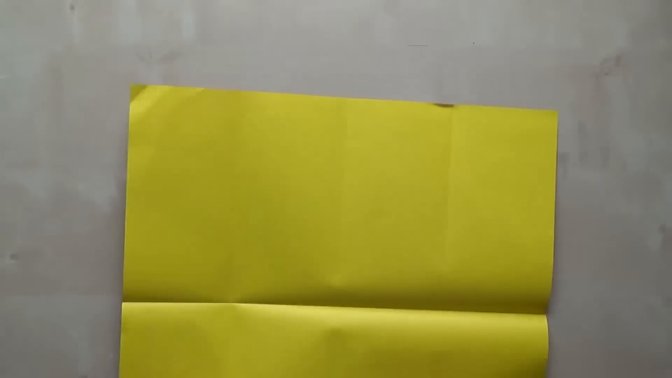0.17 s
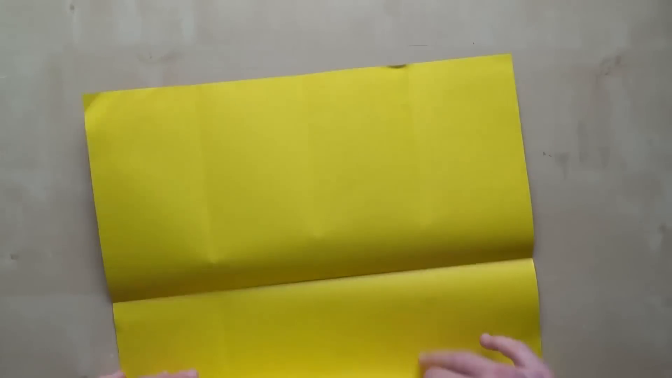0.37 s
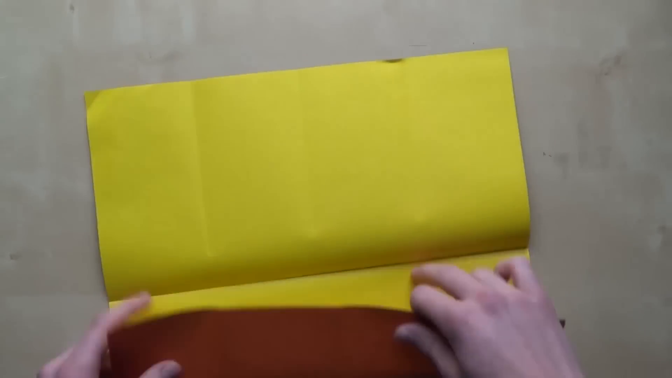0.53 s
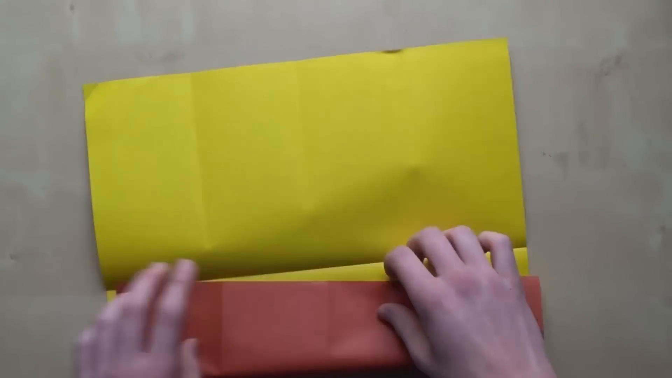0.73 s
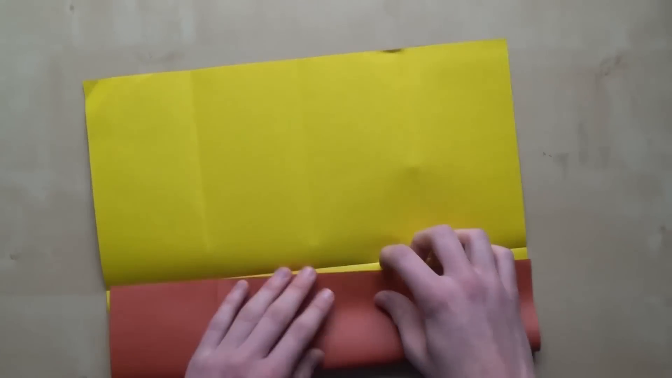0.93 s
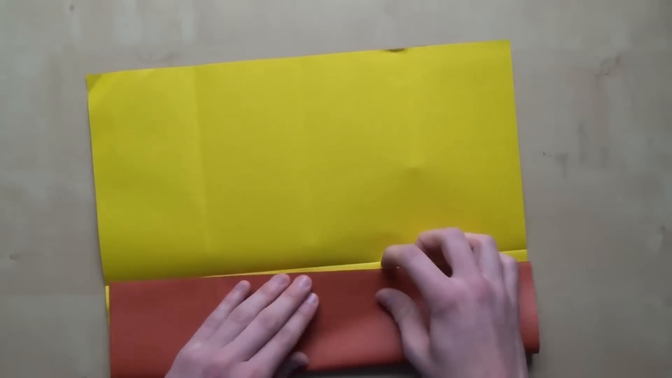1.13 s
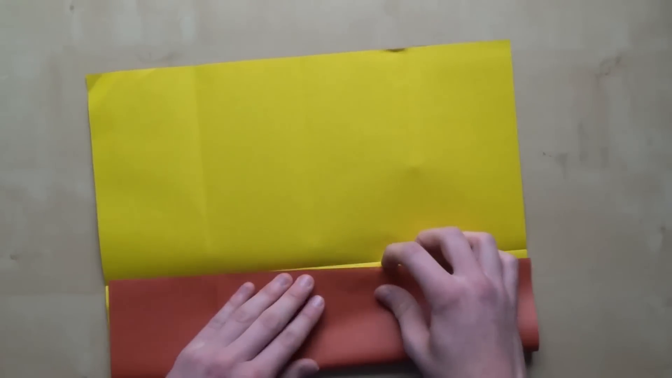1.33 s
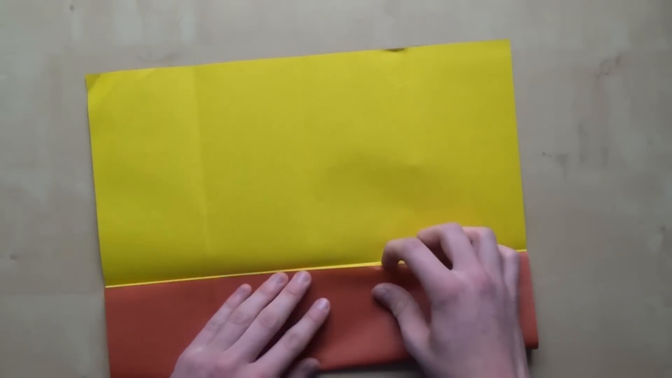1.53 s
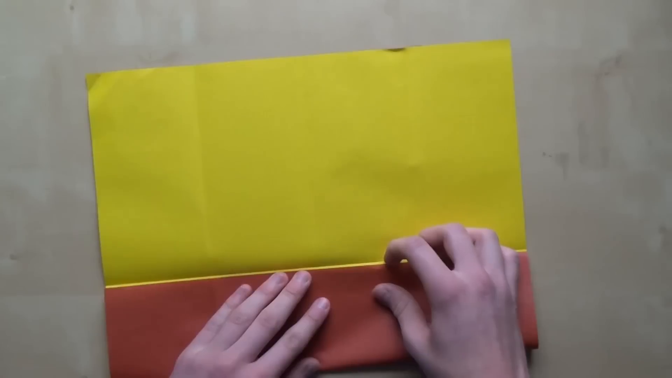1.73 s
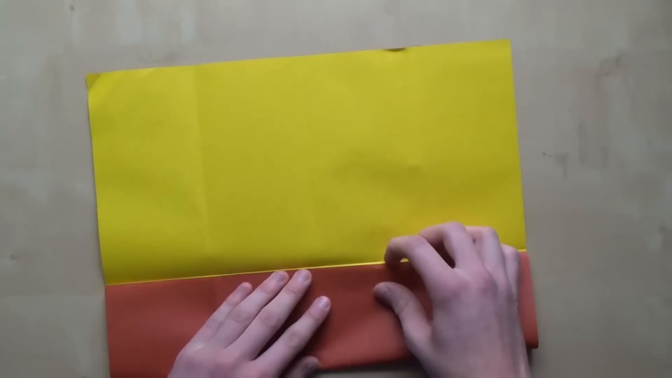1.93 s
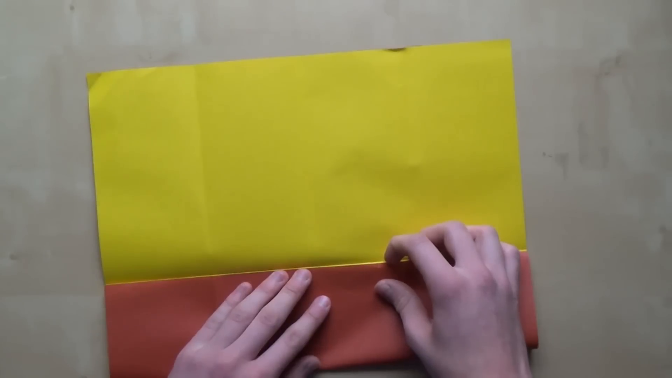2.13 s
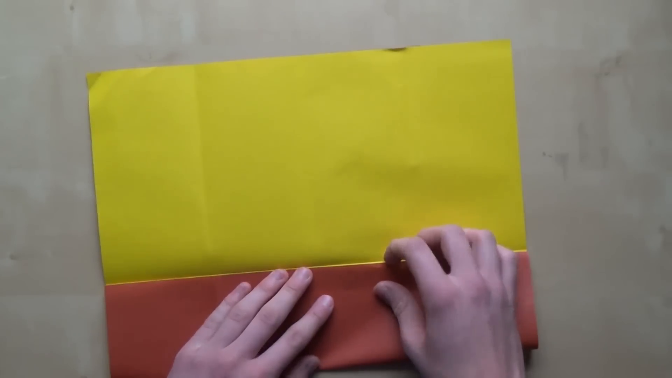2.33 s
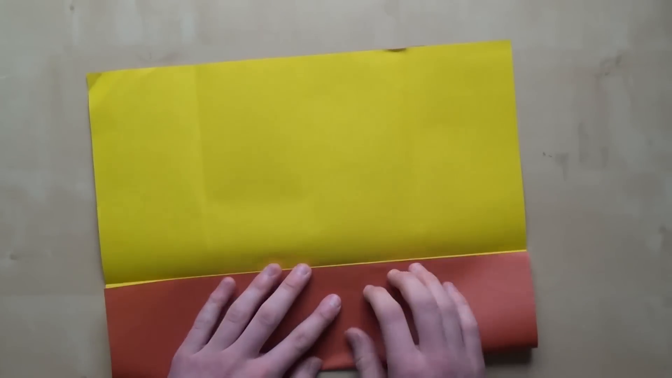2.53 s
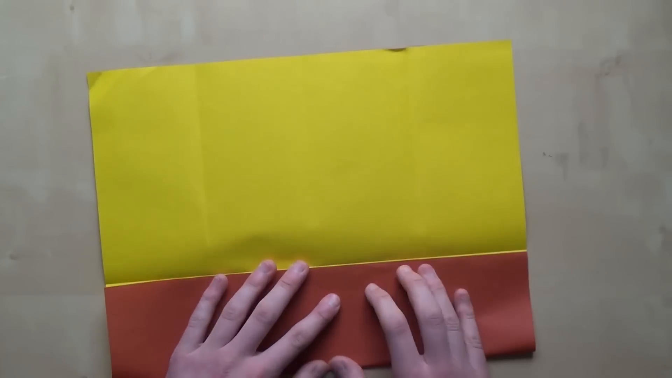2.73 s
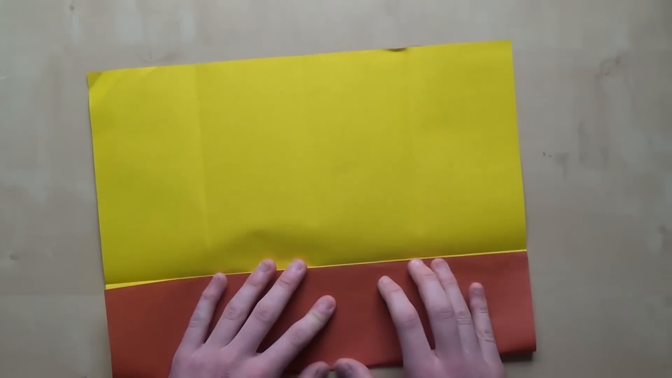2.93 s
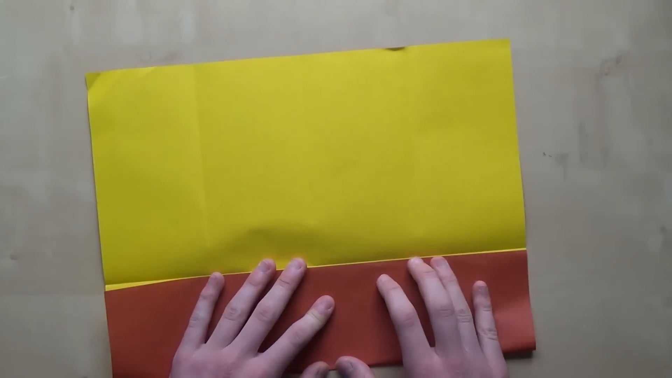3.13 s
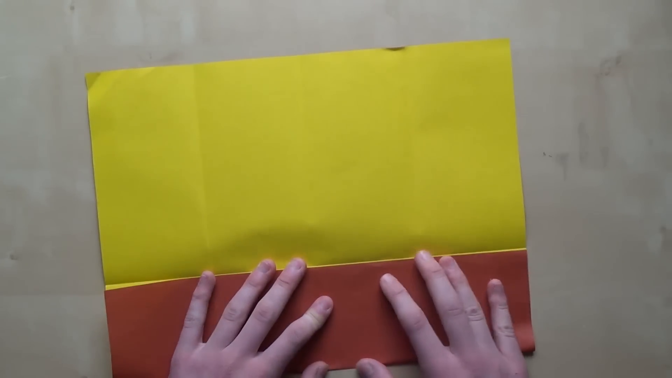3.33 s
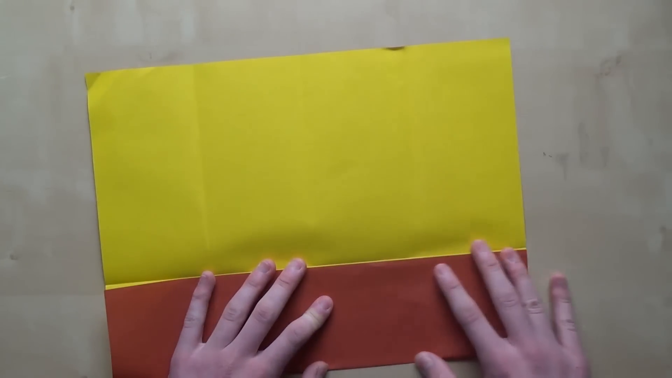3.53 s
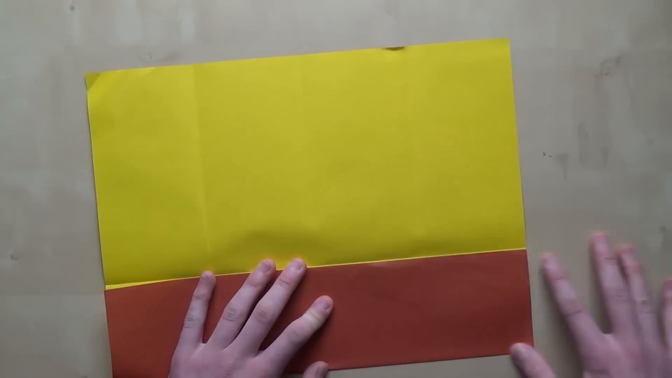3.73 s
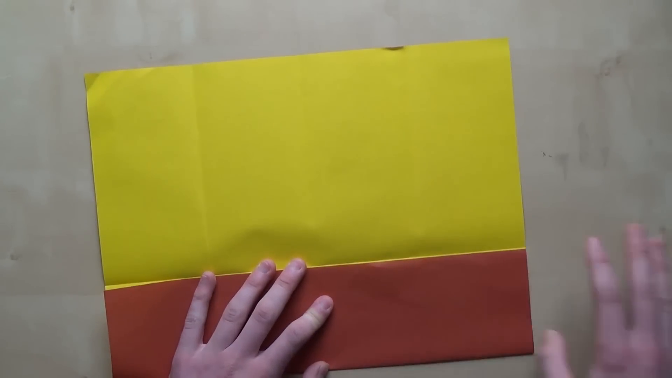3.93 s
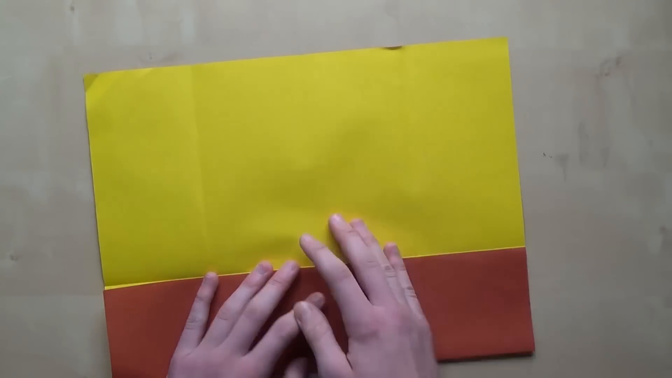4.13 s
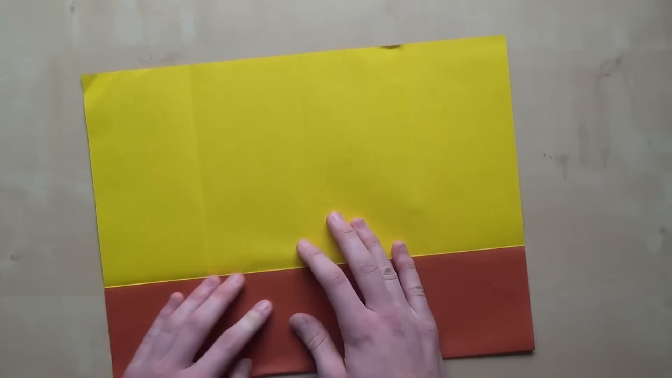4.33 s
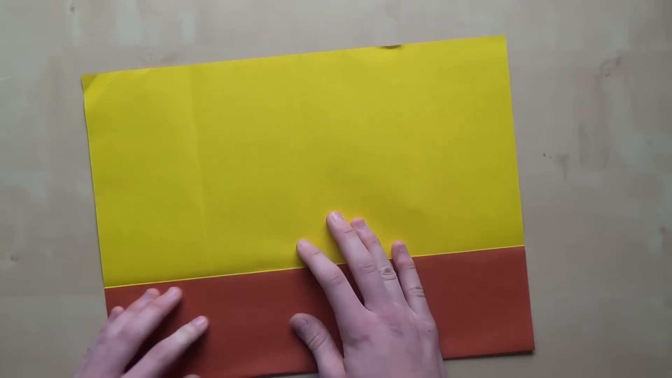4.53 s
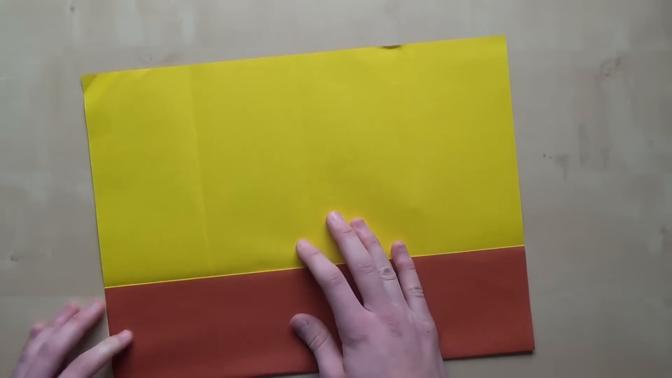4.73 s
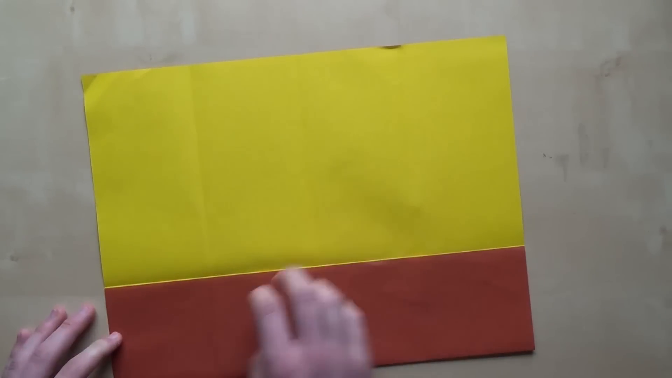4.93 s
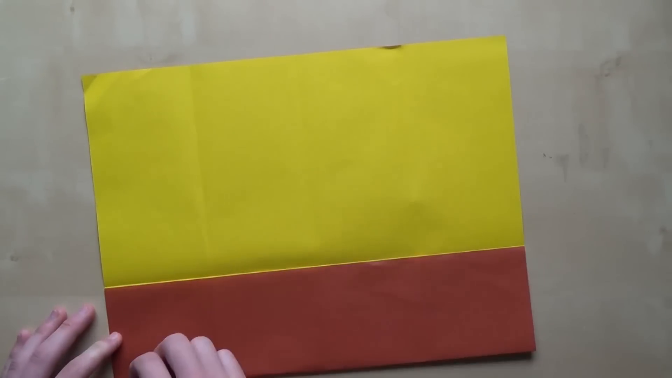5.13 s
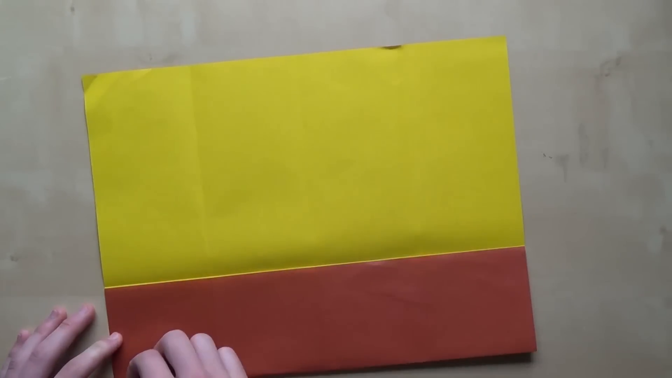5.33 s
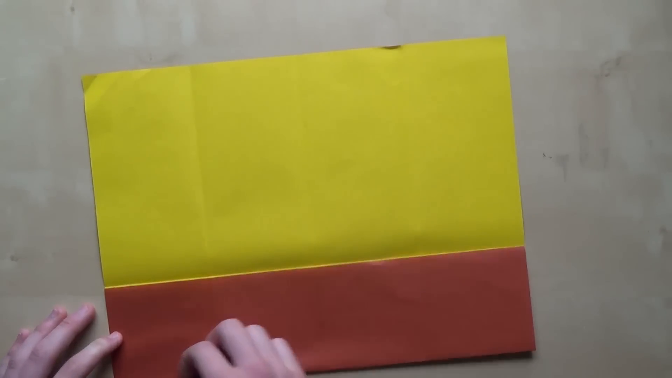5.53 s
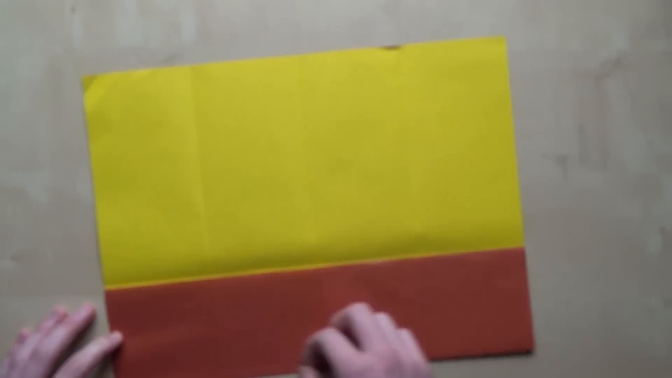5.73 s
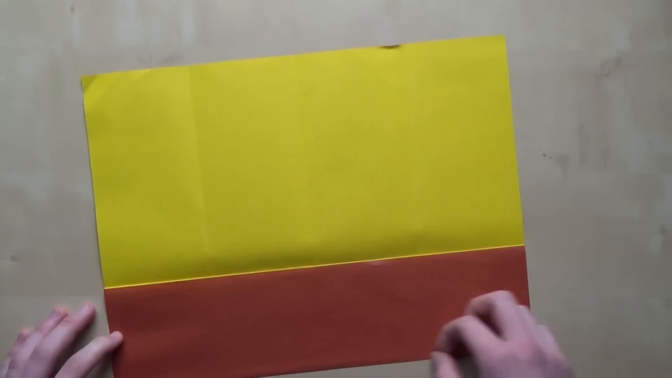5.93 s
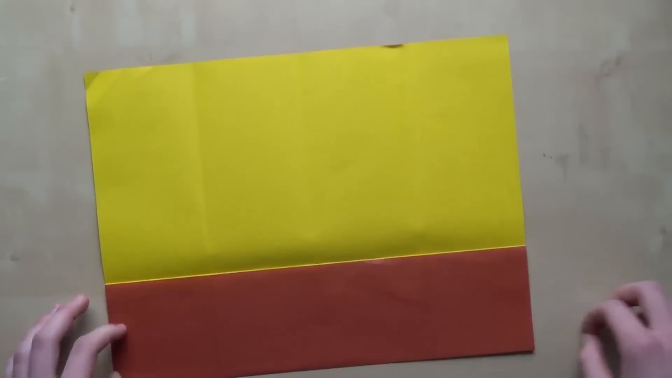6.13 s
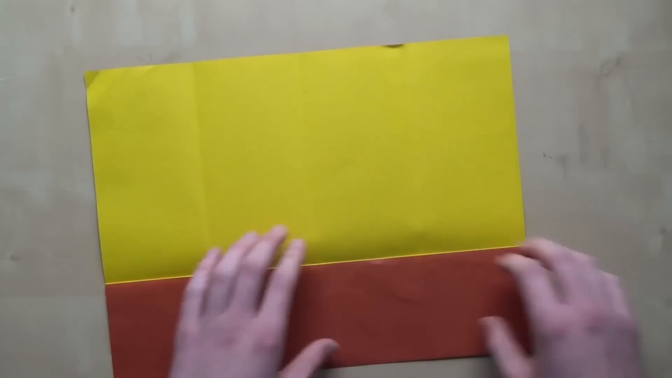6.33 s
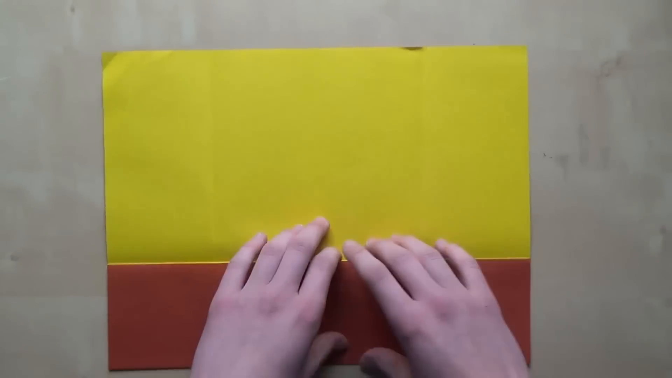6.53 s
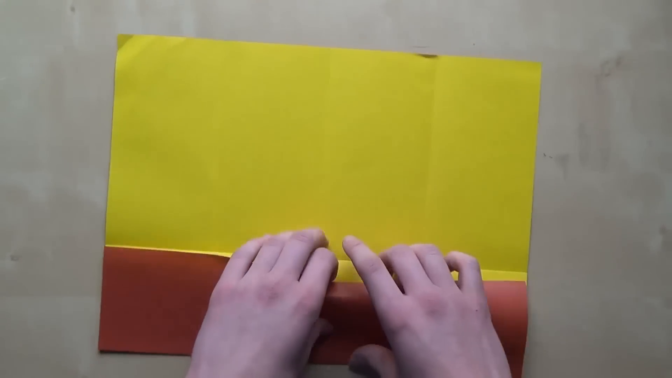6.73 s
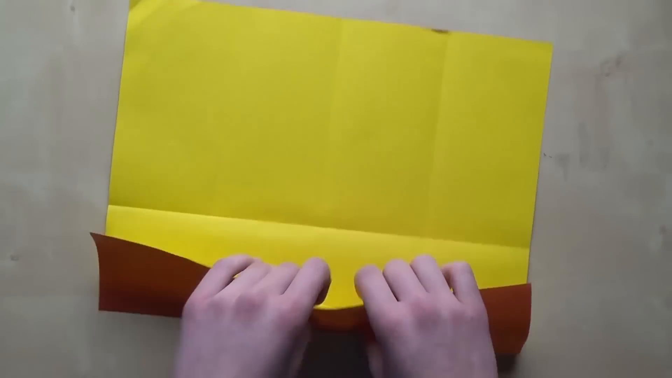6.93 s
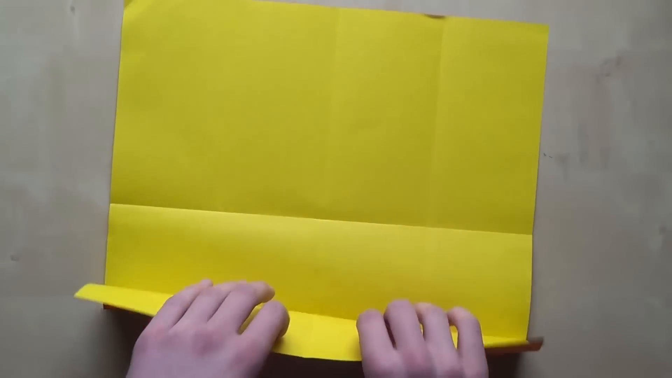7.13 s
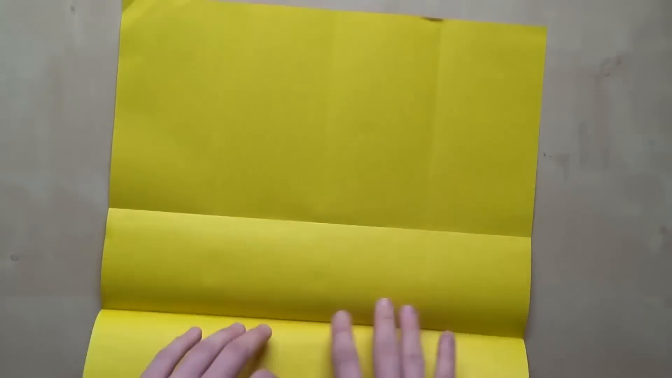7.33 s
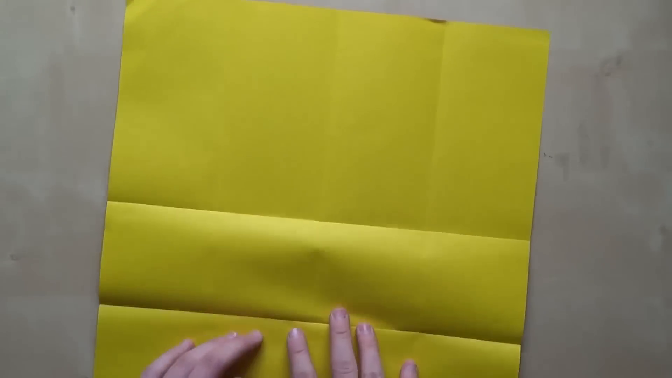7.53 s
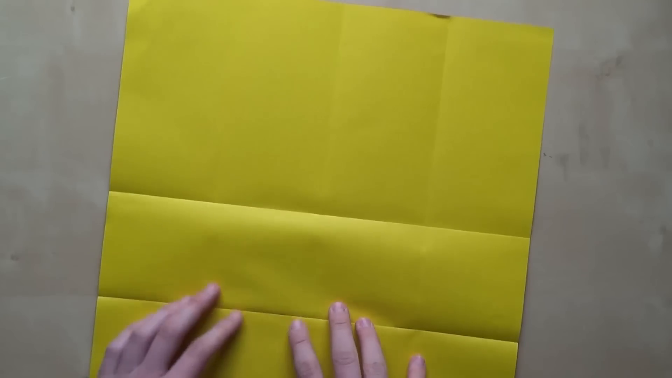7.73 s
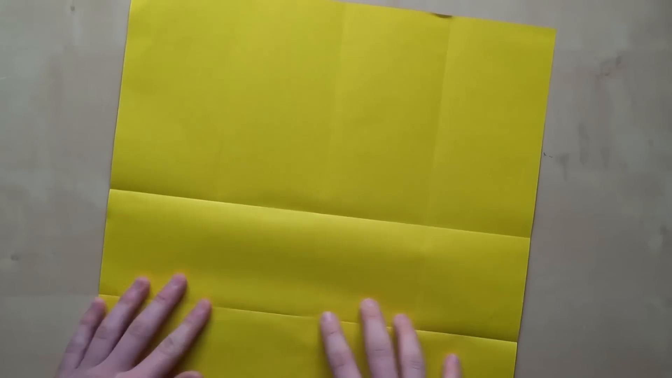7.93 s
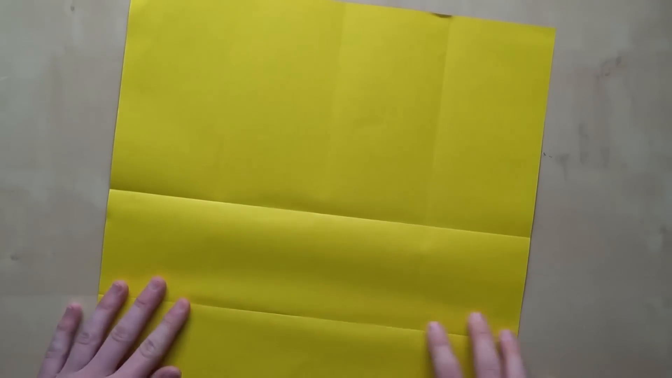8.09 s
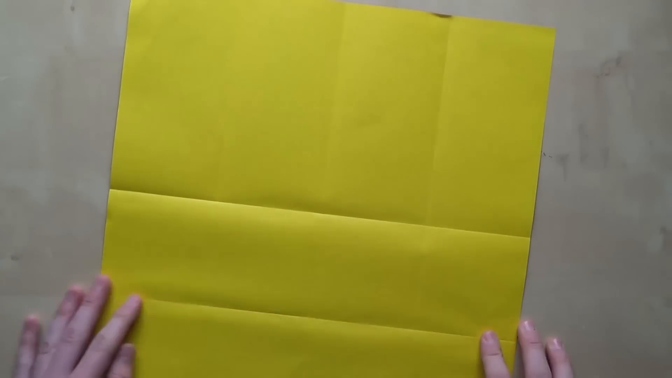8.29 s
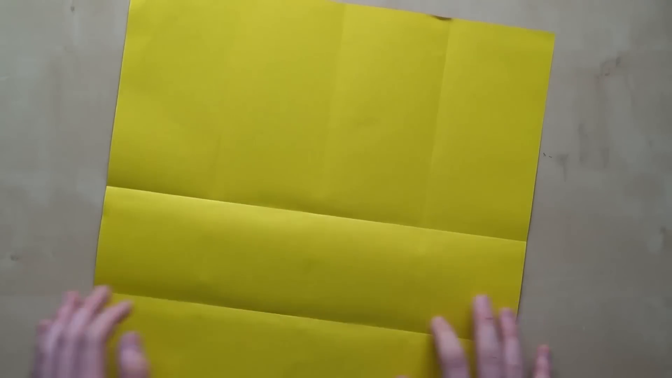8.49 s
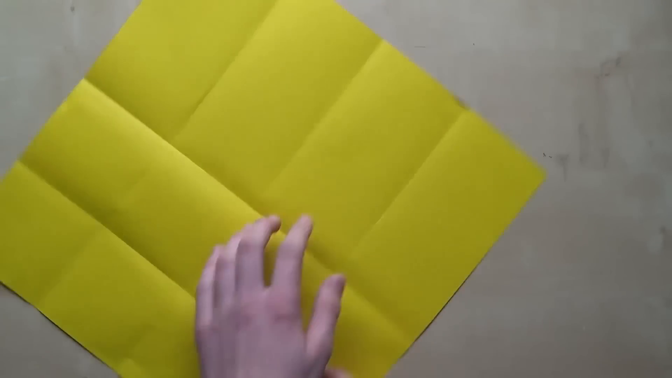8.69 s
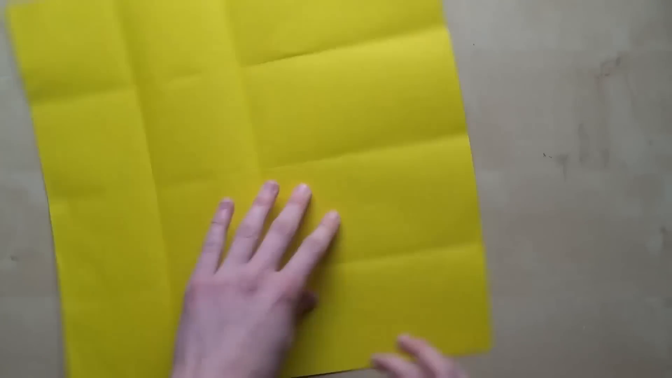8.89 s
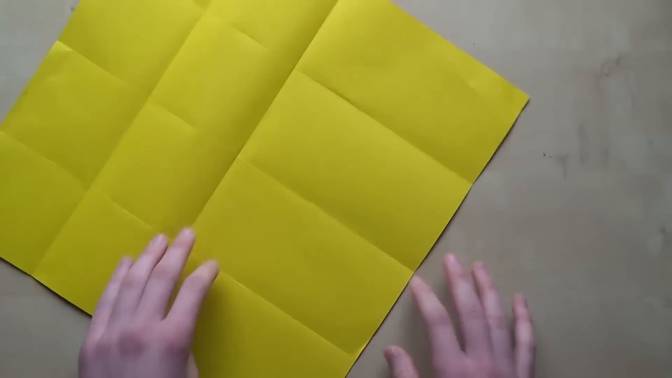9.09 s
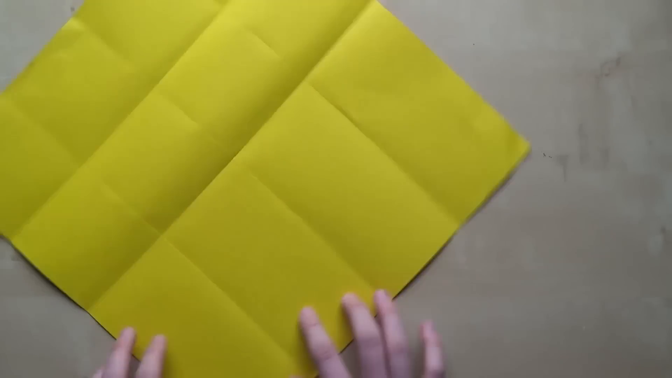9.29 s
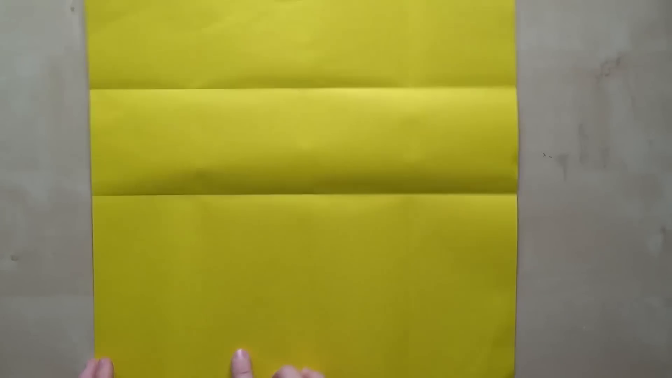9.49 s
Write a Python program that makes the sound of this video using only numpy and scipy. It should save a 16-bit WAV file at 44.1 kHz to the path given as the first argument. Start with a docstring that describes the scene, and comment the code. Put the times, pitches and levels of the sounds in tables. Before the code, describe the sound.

A big stiff sheet buckles and rustles on a wooden table, is quietly wiped and creased, rustles open, then scrapes round in a small room.

```python
"""Folding stiff paper on a table

A large sheet of stiff paper is folded, smoothed, creased, opened again and spun round on a wooden table.
Stick-slip friction makes dense clicks that the sheet's shifting resonances colour. Buckling dents snap as
short dispersed impulses, bulges rasp as brief noise bands and hands thud as low, damped ones.
Table resonances ring with the hands; a small, lively room adds echoes, steady noise and a low hum.
"""
import sys
import numpy as np
from scipy import signal
from scipy.fft import rfft, irfft
from scipy.io import wavfile
from scipy.ndimage import uniform_filter1d, map_coordinates

SR = 44100
rng = np.random.default_rng(int(sys.argv[2]) if len(sys.argv) > 2 else 0)


def put_to_file(sound):
    """Save the sound as 16-bit audio at rate SR, in the file named by the first command-line argument."""
    columns = np.atleast_2d(sound).T  # one column per channel
    safe = np.clip(columns, -1, 1)
    whole_steps = np.round(safe * 32767)
    wavfile.write(sys.argv[1], SR, whole_steps.astype(np.int16))


N = 421155  # length in samples

# Strokes of hand or sheet: each gains contact, speeds up or slows while held, then dies away.
# Each row: start in seconds, attack in seconds, hold in seconds, release in seconds per 20 dB of decay,
# level in dB before the trim of its group of movements, swell over the hold in dB,
# table drone in dB over the level, hiss in dB over the level, name of the movement.
STROKE_ROWS = [ (0.0, 0.0017, 0.14, .05, -38.5, -12, -2.5, 0.5, "swing"),
               (.043, 0.0034, .045, 0.12, -25, 2, -2, -28, "buckle"),
               (0.124, 0.015, .12, 0.051, -29.5, 2, -17, -6.5, "swing"),
               (0.279, 0.0096, 0.089, .1, -36.5, 5.5, -3.5, -5, "swing"),
               (0.37, .01, .062, .033, -20, 1, -17, -7, "skid"),
               (.445, .005, 0.14, 0.11, -35.5, -3, -4, -0.5, "align"),
               (0.594, 0.039, .03, .07, -35.5, 0, -10, -1.5, "align"),
               (0.663, 0.027, 0.07, 0.075, -31.5, 5.5, -9.5, -6.5, "align"),
               (0.787, 0.017, 0.045, .03, -32, 3.5, -14, -6.5, "align"),
               (0.866, 0.0089, 0.22, 0.068, -36, -4.5, -13, -0.5, "align"),
               (1.123, .02, 0.12, 0.082, -43, -4.5, -12.5, -0.5, "align"),
               (1.323, 0.022, .06, .05, -52, 5, -14, -3.5, "align"),
               (1.391, 0.047, 0.058, 0.048, -38, -4, -13, -1.5, "align"),
               (2.442, 0.035, 0.2, 0.2, -47, 5, -6.5, 2, "flatten"),
               (2.848, 0.02, 0.013, 0.32, -50.5, 3, -11, 1, "flatten"),
               (3.17, 0.029, 0.019, 0.11, -56, 3.5, -8, -7, "flatten"),
               (3.345, .03, 0.42, 0.21, -49, 8.5, -8.5, 3, "right wipe"),
               (3.494, 0.1, .2, .33, -56, -5, 3.5, 12, "right wipe"),
               (4.213, 0.0066, 0.031, 0.11, -43, 1, -5, -4, "left wipe"),
               (4.297, 0.038, 0.53, 0.072, -48, -7.5, -7, 9.5, "left wipe"),
               (4.543, 0.024, 0.3, .3, -61, -6, 7.5, 12, "left wipe"),
               (4.946, .015, .01, 0.074, -58.5, 0, -5, 8.5, "left wipe"),
               (5.133, 0.021, 0.059, .05, -55, -3, -1, 6.5, "left wipe"),
               (5.268, .01, 0.055, 0.32, -62.5, 2, 9, -4, "crease"),
               (5.419, 0.3, .24, .1, -39.5, 3, -3.5, 0, "crease"),
               (5.898, 0.078, 0.21, .06, -37.5, -1, -2, -1, "crease"),
               (6.205, 0.013, 0.037, 0.099, -33, -1.5, -4.5, 4.5, "crease"),
               (6.506, 0.032, .004, 0.046, -41.5, -1.5, -10, -0.5, "grip"),
               (6.58, 0.018, .22, .05, -49, -4, -7.5, 1, "grip"),
               (6.795, 0.067, 0.013, .03, -39.5, 0, -20, -2, "grip"),
               (6.86, 0.037, 0.018, 0.085, -35, -1.5, -5.5, -6, "unfold"),
               (6.924, 0.083, 0.067, 0.066, -31, -5, -10.5, 0, "unfold"),
               (7.125, 0.016, 0.13, 0.17, -38.5, -9.5, -8.5, -5, "unfold"),
               (7.422, 0.054, 0.11, .05, -42.5, 1.5, -8.5, -2.5, "unfold"),
               (7.569, 0.019, 0.07, 0.13, -37, 3.5, -5, -5.5, "unfold"),
               (7.729, 0.042, 0.076, 0.18, -40, 3.5, -13, -4.5, "spread"),
               (7.95, .15, 0.34, .12, -45, -9, -6.5, 8.5, "spread"),
               (8.519, 0.025, 0.0057, 0.026, -36, -2.5, -9, 0.5, "spread"),
               (8.628, 0.012, 0.15, 0.14, -35, 6, -13.5, 2.5, "spin start"),
               (8.721, 0.051, 0.047, .04, -29.5, 2.5, -37, -1.5, "spin start"),
               (8.9, 0.07, 0.19, 0.082, -26, -4, -24.5, 1.5, "spin on"),
               (9.339, 0.02, 0.18, .1, -32, 10.5, -18, -0.5, "spin end")]


def undb(db):
    """Amplitude gain is ten to the power of decibels over twenty."""
    return 10 ** (np.asarray(db) / 20)


def unit(x):
    """Normalisation by root mean square: scale to rms 1."""
    return x / np.sqrt(np.mean(x ** 2) + 1e-20)


def add(out, s, sound):
    """Superposition: mix a sound into out from time s in seconds."""
    at = max(int(s * SR), 0)
    out[at:at + len(sound)] += sound[:max(N - at, 0)]


def tone(points):
    """Spectral envelope: a function from Hz to dB, joining its points by straight lines in log frequency."""
    hz, db = np.transpose(points)
    return lambda f: np.interp(np.log(f), np.log(hz), db)


def hump(centre_hz, octaves, depth_db, squareness):
    """Broad resonance with skirts depth_db below its top; squareness flattens the top and steepens the sides."""
    def db_at(f):
        distance = np.abs(np.log2(f / centre_hz) / octaves)
        return depth_db * (np.exp(-distance ** squareness / (2 * np.pi)) - 1)
    return db_at


def colour(x, db_at, size=4096):
    """Minimum-phase filtering: folding the cepstrum gives a causal response with the dB at each frequency."""
    f = np.maximum(np.fft.rfftfreq(size, 1 / SR), 1)
    cepstrum = irfft(np.log(undb(db_at(f)) + 1e-6))
    cepstrum[1:size // 2] *= 2
    cepstrum[size // 2 + 1:] = 0
    response = irfft(np.exp(rfft(cepstrum)))
    return signal.fftconvolve(x, response)[:len(x)]


def below(x, hz):
    """Zero-phase low-pass filtering: the part of a sound under hz."""
    return signal.sosfiltfilt(signal.butter(3, hz, fs=SR, output="sos"), x)


def resonate(x, hz, width_hz):
    """A single damped resonance, with gain 1 at its centre."""
    return signal.lfilter(*signal.iirpeak(hz, hz / width_hz, fs=SR), x)


def walk(n, rate):
    """Smoothed random steps, rate per second, give a wandering with a spread near 1."""
    k = max(int(SR / rate), 1)
    steps = np.repeat(rng.standard_normal(n // k + 2), k)
    return unit(uniform_filter1d(steps, k))[:n]


def background():
    """Diffuse noise that differs between channels in the bass, and a hum whose pitch and level waver."""
    # Steady noise of the room. Each row: frequency in Hz, relative level in dB.
    floor_tone = [(25, -15), (60, -7), (95, -1.5), (160, -8.5), (750, -9.5), (1300, -14.5), (2400, -14),
                  (3000, -19.5), (11000, -24.5), (15000, -58)]
    # Slow course of the hum. Each row: time in seconds, mean level in dB.
    hum_levels = [(0, -66), (1.2, -70), (2.2, -64), (2.7, -58), (4, -56), (5.4, -57.5), (6.2, -58.5),
                  (7.3, -68), (8.3, -63.5), (9.5, -55.5)]
    floor_db, hum_hz = -54, 90.2
    mid, side = (unit(colour(rng.standard_normal(N), tone(floor_tone))) for _ in range(2))
    noise = mid + 0.37 * below(side, 390) * np.array([[1], [-1]])
    hum_s, hum_db = np.transpose(hum_levels)
    level_db = np.interp(np.arange(N) / SR, hum_s, hum_db) + 0.96 * walk(N, 6)
    phase = 2 * np.pi * np.cumsum(hum_hz + .5 * walk(N, 5.4)) / SR
    hum = np.sqrt(2) * np.sin(phase) * undb(level_db)
    return undb(floor_db) * noise + hum


def effort(movement, t):
    """Friction grows with speed: rasp and hiss gains follow contact and speed, the drone contact alone."""
    power = np.zeros((3, len(t)))
    for start, attack, hold, release, db, swell_db, drone_db, hiss_db, name in STROKE_ROWS:
        if name == movement:
            age = t - start
            rise = np.sin(np.pi / 2 * np.clip(age / attack, 0, 1)) ** 2
            touch = rise * 10 ** (-np.maximum(age - attack - hold, 0) / release)
            speed = undb(swell_db * np.clip((age - attack) / hold, 0, 1))
            drone = np.full(len(t), undb(drone_db))
            gains = undb(db) * touch * np.array([speed, drone, speed * undb(hiss_db)])
            power += gains ** 2
    return np.sqrt(power)


def flex(x, depth_db, size=512):
    """Modes of a flexing sheet rise, sink and shift; in the treble they merge and even out."""
    ripple_hz, ripple_s, merge_hz = 260, .025, 3500  # spacing of the modes, their time scale, where they merge
    f, t, bins = signal.stft(x, SR, nperseg=size)
    places = np.meshgrid(f / ripple_hz, t / ripple_s, indexing="ij")
    heights = rng.standard_normal([int(p.max()) + 2 for p in places])
    ripple = unit(map_coordinates(heights, places, order=1)) / (1 + (f[:, None] / merge_hz) ** 2)
    return signal.istft(bins * unit(undb(depth_db * ripple)), SR, nperseg=size)[1][:len(x)]


def rub(movement, spectrum, slips, spread_db, judder_db):
    """Stick-slip friction: fibres click about slips times a second, juddering, and the sheet colours them."""
    start = min(row[0] for row in STROKE_ROWS if row[-1] == movement)
    n = 2 * SR
    rasp_gain, drone_gain, hiss_gain = effort(movement, start + np.arange(n) / SR)
    size, chance, sign, fine = rng.random((n, 4)).T
    # slip sizes in dB follow an exponential law, cut off at four times the spread
    sizes = undb(spread_db * np.minimum(-np.log(1 - size), 4)) * np.sign(sign - .5)
    clicks = unit(sizes * (chance < slips / SR)) + .5 * unit(fine - .5)
    contact = undb(judder_db * (walk(n, 120) + 0.84 * walk(n, 30.08)))
    sound = flex(colour(clicks * contact, tone(spectrum)), depth_db=2.0)
    # pressure makes the table drone under the sheet; speed adds hiss on top
    drone = below(sound, 1200)
    hiss = sound - below(sound, 5000)
    rasp = sound - drone - hiss
    out = np.zeros(N)
    add(out, start, rasp_gain * unit(rasp) + drone_gain * unit(drone) + hiss_gain * unit(hiss))
    return out


def bending():
    """Stick-slip friction of a bent sheet: the flap rustles grainily while bent, laid down and opened."""
    # Colours of the flap buckling, swinging over, being laid against the middle crease, and being
    # opened and pushed down. Each row: frequency in Hz, relative level in dB.
    buckle_tone = [(88, -46), (150, -16.5), (479, -13.5), (565, 0), (1030, -8), (1370, -3), (2160, -3),
                   (3800, -9), (6430, -27), (10500, -37), (11500, -53), (15000, -83), (22000, -120)]
    swing_tone = [(88, -61), (150, -19), (728, -6.5), (1110, -12), (1370, -6.5), (2640, -3.5), (10500, -15),
                  (11500, -21), (15000, -50), (22000, -120)]
    align_tone = [(88, -42), (150, -18), (1030, -8), (1130, -7), (1800, -4), (7440, -10.5), (10700, -9.5),
                  (11500, -16), (15000, -45), (22000, -120)]
    unfold_tone = [(88, -52), (150, -11), (812, -3), (1100, -2.5), (2460, -0.5), (10700, -5), (11500, -10),
                   (15000, -50), (22000, -120)]
    rustle = (rub("buckle", buckle_tone, slips=1500, spread_db=2.5, judder_db=0.8)
              + rub("swing", swing_tone, slips=3200, spread_db=1.4, judder_db=1.6)
              + rub("align", align_tone, slips=1800, spread_db=2.3, judder_db=1.9)
              + rub("unfold", unfold_tone, slips=3200, spread_db=1.5, judder_db=2.3))
    return rustle * undb(-1.37)


def blow(decay_ms, db_at, flutter, size=4096):
    """Dispersion of an impulse: a sharp push and its dying flutter, coloured; its loudest millisecond has rms 1."""
    ms = np.arange(size) * 1000 / SR
    fade = np.exp(-ms / decay_ms)
    push = rng.standard_normal(size) * fade
    push *= flutter / np.linalg.norm(push)
    push[0] = 1
    # bending waves scatter the push in time: flatten the spectrum, keep the phases, fade a little
    for _ in range(4):
        push = irfft(np.exp(1j * np.angle(rfft(push)))) * fade ** 0.074
    ring = colour(push, db_at)
    return ring / np.sqrt(uniform_filter1d(ring ** 2, size=44).max())


def snaps():
    """Snap-through buckling: dents in the stiff sheet flip with a dry tick and ring the sheet briefly."""
    # Ticks of the buckling sheet. Each row: start in seconds, level in dB before ringing and the trim below,
    # centre in Hz, width in octaves, decay of the push in milliseconds.
    snap_rows = [(0.0424, -12.5, 2000, 1.3, 3.8), (.062, -13, 2280, 0.83, 0.77),
                 (0.0692, -12, 1890, 0.66, 1.2), (.296, -19.5, 2370, 0.73, 2.9),
                 (0.352, -14.5, 4180, .8, 0.83), (.577, -22, 4600, 0.85, 0.78), (.638, -24, 2400, .6, 2),
                 (.759, -20, 2000, 1.3, 2.6), (.8425, -19, 3600, 0.89, 1.5), (.851, -17, 1800, 0.65, 1.6),
                 (.882, -22, 3000, 1.1, 1.5), (0.8957, -13.5, 2100, 0.65, 2.4),
                 (1.083, -18.5, 2900, 1.17, 4.5), (1.5723, -28, 3300, 1.0, 2.8),
                 (1.66, -23, 2900, 1.0, 1.9), (2.034, -42, 1410, 0.68, 8.1),
                 (2.225, -38.5, 5500, 1.35, 7.7), (2.467, -34, 3500, 1.7, 3), (2.7902, -20, 2110, .7, 1.9),
                 (3.159, -27.5, 8500, 0.79, 2), (3.7675, -12, 4430, .7, 1.8), (4.252, -21, 4230, 1.1, 1.8),
                 (5.196, -38, 3500, 1.3, 2.5), (5.2141, -27, 3000, .75, 2.9), (6.068, -25, 2400, 1.4, 2.3),
                 (6.213, -13.5, 5000, 0.7, 3.0), (6.501, -31.5, 3600, .85, 1.6),
                 (6.8835, -16, 5470, 0.81, 1.9), (7.008, -17.5, 1680, 1.43, 9),
                 (7.174, -20.5, 2800, 1.7, 5.6), (7.3055, -29, 2600, 0.92, 5), (7.583, -25, 2000, 1.0, 3),
                 (7.644, -23, 2300, 1.2, 0.98), (7.6497, -12, 2500, 1.0, 2.0)]
    # Resonances that every snap rings. Each row: frequency in Hz, width in Hz, level in dB over the dry snap.
    sheet_modes = [(1520, 260, -1.5), (3000, 480, 2)]
    dry_snaps = np.zeros(N)
    for s, db, hz, octaves, decay_ms in snap_rows:
        spectrum = hump(hz, octaves, depth_db=39.5, squareness=2.22)
        add(dry_snaps, s, undb(db) * blow(decay_ms, spectrum, flutter=2.8))
    ringing = sum(undb(db) * resonate(dry_snaps, hz, width) for hz, width, db in sheet_modes)
    return undb(-2.5) * flex(dry_snaps + ringing, depth_db=1.6)


def flutters(size=8192):
    """Friction after buckling: a bulge gives way and shuffles over the layer below, a rasp that builds and dies."""
    # Short rasps. Each row: time of the peak in seconds, level in dB before flexing, centre in Hz,
    # width in octaves, rise in milliseconds, decay in milliseconds.
    flutter_rows = [(0.085, -26, 1400, 1.1, 4.1, 10), (.109, -21, 1600, 0.94, 2, 6),
                    (.217, -25.5, 2800, 0.84, 3.6, 8.8), (0.253, -27, 2500, .9, 4.7, 8),
                    (0.44, -19, 3200, 0.69, 2.8, 4), (.528, -35, 1700, .8, 2.8, 10),
                    (.589, -29.5, 1400, 0.97, 4, 6), (.638, -26, 2370, 0.44, 12.5, 9),
                    (.7, -27, 1800, 1.1, 7.5, 8), (.763, -24.5, 2000, 1.2, 7.8, 8),
                    (.843, -23, 2100, 1.0, 6.4, 7), (.879, -25.5, 1700, 0.85, 4, 4.6),
                    (.912, -27, 1980, .25, 6.4, 13), (1.0, -36, 1600, 0.65, 3.96, 5.3),
                    (1.066, -33, 3200, .8, 3, 4), (1.094, -28.5, 2600, .9, 3, 7),
                    (1.575, -39, 3200, .6, 2, 11), (1.663, -37, 3000, .7, 2, 9),
                    (2.648, -42, 1500, .8, 3, 7), (2.792, -36, 2950, .3, 2, 10),
                    (3.607, -34.5, 4000, 1.4, 15.5, 23), (3.686, -31.5, 4500, 1.3, 3.6, 5.6),
                    (3.778, -29, 3900, 0.47, 7.7, 22), (4.232, -38, 4000, 0.65, 4, 7),
                    (4.254, -37, 3500, 1.2, 7, 10), (5.147, -44, 5400, .45, 2, 14),
                    (5.218, -42, 2850, 0.2, 3, 18), (6.907, -29, 2200, 1.0, 9, 7),
                    (7.011, -22, 2170, 1.35, 7.4, 13), (7.073, -30.5, 4000, 1.1, 6, 12),
                    (7.151, -32, 2300, 1.0, 3, 7), (7.47, -36, 1890, 0.67, 4, 6.3),
                    (7.495, -32, 2700, .6, 7, 6), (7.531, -26.5, 1820, 1.17, 8.8, 13),
                    (7.586, -28, 1950, 0.7, 12, 14),  (8.121, -33, 3700, .6, 2.2, 4),
                    (8.812, -24, 4000, .45, 21, 6)]
    out = np.zeros(N)
    ms = np.arange(size) * 1000 / SR
    for s, db, hz, octaves, rise_ms, decay_ms in flutter_rows:
        spectrum = hump(hz, octaves, depth_db=42, squareness=2.23)
        rasp = unit(colour(rng.standard_normal(size), spectrum))
        shape = np.minimum(ms / rise_ms, 1) * np.exp(-np.maximum(ms - rise_ms, 0) / decay_ms)
        add(out, s - rise_ms / 1000, undb(db) * shape * rasp)
    return flex(out, depth_db=3.0)


def sliding():
    """Stick-slip friction of paper on wood: the whole sheet rasps over the grain."""
    # Colours of the sheet skidding, then of the pushes that start, continue and end its spin.
    # Each row: frequency in Hz, relative level in dB.
    skid_tone = [(180, -94), (300, -65), (460, -21), (727, -16), (886, -21), (971, -14), (3390, -5),
                 (10300, -15.5), (11500, -17), (15000, -59), (22000, -120)]
    start_tone = [(88, -53), (150, -31), (201, -18), (506, -23.5), (630, -18.5), (1480, -22), (2050, -15),
                  (4470, -3), (10900, -4), (11500, -17), (15000, -40), (22000, -120)]
    on_tone = [(88, -52), (150, -34), (208, -21), (471, -25.5), (922, -18), (1620, -18), (1870, -13.5),
               (3410, -5), (5000, -2.5), (7170, -3.5), (10700, -0.5), (11500, -9), (15000, -40),
               (22000, -120)]
    end_tone = [(88, -60.5), (150, -26), (294, -17), (479, -37), (554, -24), (1740, -16.5), (1910, -17),
                (3230, -1.5), (7300, -10), (10500, -8), (11500, -9.5), (15000, -44), (22000, -120)]
    rasp = (rub("skid", skid_tone, slips=5000, spread_db=0.5, judder_db=0.75)
            + rub("spin start", start_tone, slips=8200, spread_db=2.5, judder_db=1.0)
            + rub("spin on", on_tone, slips=6000, spread_db=2.5, judder_db=1.0)
            + rub("spin end", end_tone, slips=6000, spread_db=2.0, judder_db=0.1))
    return rasp * undb(-0.43)


def smoothing():
    """Stick-slip friction of skin on paper: a fine swish, grittier for the knuckles on the fold."""
    # Colours of fingers flattening the flap, each hand wiping outwards, knuckles pressing along the fold,
    # fingertips feeling for the edge, both hands spreading the sheet.
    # Each row: frequency in Hz, relative level in dB.
    flatten_tone = [(65, -27), (110, -5), (321, -10.5), (367, -23), (621, -13), (3440, -7), (11500, -8),
                    (15000, -38), (22000, -120)]
    right_tone = [(88, -39), (150, -12), (305, -9), (446, -7), (1210, -7), (1330, -1.5), (2160, -5),
                  (3600, 1), (10500, 2.5), (11500, 3), (15000, -46), (22000, -120)]
    left_tone = [(88, -45), (150, -9.5), (327, -10.5), (405, -2), (445, -7), (535, -5), (1560, -12.5),
                 (6200, -8.5), (11500, -3), (15000, -41), (22000, -120)]
    crease_tone = [(71, -44), (120, -7), (157, -7), (248, -3), (465, -3), (961, -2.5), (1950, -6),
                   (3390, -6), (7000, -18), (10700, -14), (11500, -21), (15000, -37), (22000, -120)]
    grip_tone = [(88, -39), (150, -5), (346, -5), (596, -5), (1430, -5.5), (1870, -10.5), (4990, -0.5),
                 (11500, -2), (15000, -41), (22000, -120)]
    spread_tone = [(88, -47), (150, -3.5), (769, -6.5), (2010, -10.5), (3730, -3), (5980, -0.5),
                   (10500, 7.5), (11500, 1.5), (15000, -36.5), (22000, -120)]
    swish = (rub("flatten", flatten_tone, slips=9000, spread_db=2.0, judder_db=0.9)
             + rub("right wipe", right_tone, slips=7000, spread_db=2.0, judder_db=0.8)
             + rub("left wipe", left_tone, slips=12000, spread_db=2.0, judder_db=0.5)
             + rub("crease", crease_tone, slips=2600, spread_db=1.9, judder_db=1.6)
             + rub("grip", grip_tone, slips=4400, spread_db=3.5, judder_db=1.5)
             + rub("spread", spread_tone, slips=13000, spread_db=-1.0, judder_db=0.9))
    return swish * undb(-1.02)


def thuds():
    """Damped impact: soft hands knock the table through the paper."""
    # Hands landing on sheet and table. Each row: start in seconds, level in dB before the table rings,
    # centre in Hz, decay of the push in milliseconds.
    thud_rows = [(2.604, -41, 140, 12), (2.644, -37, 134, 14), (2.699, -38, 145, 13), (3.36, -43, 115, 11),
                 (4.24, -37, 151, 17), (4.321, -39.5, 151, 17), (5.197, -32.5, 256, 6.6),
                 (5.214, -25.5, 265, 11), (5.222, -32, 380, 34), (5.33, -41, 290, 24),
                 (5.755, -37, 300, 14), (5.908, -33, 250, 13), (6.215, -30, 640, 10),
                 (6.513, -44, 130, 9.2), (6.657, -45, 130, 9), (7.01, -32, 950, 17), (7.607, -26, 220, 11),
                 (7.626, -30.5, 120, 11), (8.639, -34, 1300, 5), (8.644, -28.5, 112, 30),
                 (8.929, -39.5, 171.5, 12), (9.254, -39.5, 397, 35), (9.36, -38, 128.5, 9),
                 (9.382, -38, 506, 6.5)]
    out = np.zeros(N)
    for s, db, hz, decay_ms in thud_rows:
        spectrum = hump(hz, octaves=0.92, depth_db=53.5, squareness=1.85)
        add(out, s, undb(db) * blow(decay_ms, spectrum, flutter=1.66))
    return out


def table(x, wander_db):
    """Sympathetic resonance: modes of the table top come and go as the hands travel over it."""
    # Resonances of the table top. Each row: frequency in Hz, width in Hz,
    # level in dB over the dry contact, about which it wanders.
    table_modes = [(255, 40, -11), (600, 60, -8), (800, 31, -8.5), (966, 37, -13)]
    return x + sum(resonate(x * undb(db + wander_db * walk(N, 7)), hz, width) for hz, width, db in table_modes)


def glides():
    """Heterodyned noise: hiss swells, slides in pitch and fades as hands, knuckles or sheet change speed or contact."""
    # Sliding hiss of hands, knuckles and the spinning sheet. Each row: start in seconds, end in seconds,
    # start frequency in Hz, end frequency in Hz, half width in Hz, level in dB at the middle.
    glide_rows = [(4.304, 4.56, 4000, 7460, 600, -46), (5.52, 5.68, 480, 1080, 260, -45),
                  (5.59, 5.8, 998, 1464, 280, -45), (5.691, 5.8, 560, 640, 170, -42.5),
                  (5.85, 6.029, 1010, 929.5, 90, -43), (6.581, 6.831, 5020, 2890, 600, -54.5),
                  (7.734, 7.949, 2806, 4070, 600, -61), (8.003, 8.301, 3600, 8070, 600, -48),
                  (8.71, 8.825, 7010, 4410, 900, -28), (8.944, 9.025, 4100, 3196, 550, -23.5),
                  (9.02, 9.159, 4300, 5600, 905, -32.5)]
    out = np.zeros(N)
    for start, end, start_hz, end_hz, width_hz, db in glide_rows:
        progress = np.linspace(0, 1, int((end - start) * SR))
        phase = 2 * np.pi * np.cumsum(start_hz * (end_hz / start_hz) ** progress) / SR
        lowpass = signal.butter(2, width_hz, fs=SR, output="sos")
        noise = signal.sosfilt(lowpass, rng.standard_normal((2, SR))[:, :len(phase)])
        # two low noises on carriers a quarter turn apart make one moving band
        band = unit(noise[0] * np.cos(phase) + noise[1] * np.sin(phase))
        add(out, start, undb(db) * band * np.sqrt(np.abs(np.sin(np.pi * progress))))
    return out


def room(x, wet_db, bass_t60, mid_t60, treble_t60, gap_s, echo_s, echo_db):
    """Reverberation: direct sound, one reflection from a nearby surface, then dense, exponentially dying echoes."""
    t = np.arange(SR * 3 // 5) / SR
    tail = 0
    for band, t60 in [((60, 500), bass_t60), ((500, 4500), mid_t60), ((4500, 15000), treble_t60)]:
        bandpass = signal.butter(3, band, "band", fs=SR, output="sos")
        noise = signal.sosfilt(bandpass, rng.standard_normal(len(t)))
        tail = tail + noise * np.exp(-np.log(1000) * t / t60)  # down 60 dB after t60 seconds
    tail = tail * np.clip(t / gap_s - .5, 0, 1)
    response = undb(wet_db) * tail / np.linalg.norm(tail)
    response[0] = 1
    response[int(echo_s * SR)] += undb(echo_db)
    return signal.fftconvolve(x, response / np.linalg.norm(response))[:N]


def scene():
    """Superposition of paper and hands in the room; a standing wave leaves a hollow in the upper bass."""
    on_table = table(smoothing() + thuds(), wander_db=3.5)
    paper = on_table + bending() + sliding() + glides() + snaps() + flutters()
    echoing = room(paper, wet_db=-8.5, bass_t60=0.61, mid_t60=0.39, treble_t60=0.31,
                   gap_s=0.003, echo_s=.0029, echo_db=-17.5)
    sound = echoing + background()
    return sound - undb(-3.5) * resonate(sound, hz=165, width_hz=22)


def record(dry):
    """Level difference between channels: the bass leans mostly left; a steep low-pass cuts the top."""
    # Balance of the microphone. Each row: frequency in Hz, left minus right in dB.
    bass_lean = [(30, -6), (85, 13.5), (130, 5), (250, 3), (500, 4.5), (1000, 0)]
    top_hz = 11350
    f = np.maximum(np.fft.rfftfreq(2 * N, 1 / SR), 1)
    left = 2 / (1 + undb(-tone(bass_lean)(f)))
    sound = irfft(rfft(dry, 2 * N) * np.array([left, 2 - left]))[:, :N]
    return signal.sosfilt(signal.ellip(10, .2, 70, top_hz, fs=SR, output="sos"), sound)


dry = scene()
out = record(dry)
put_to_file(out)
```